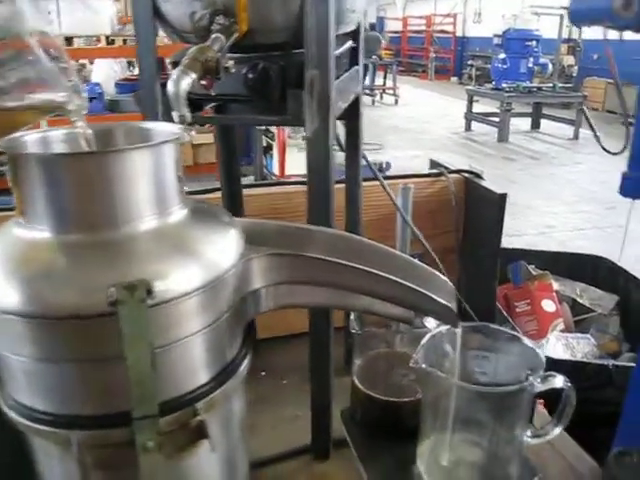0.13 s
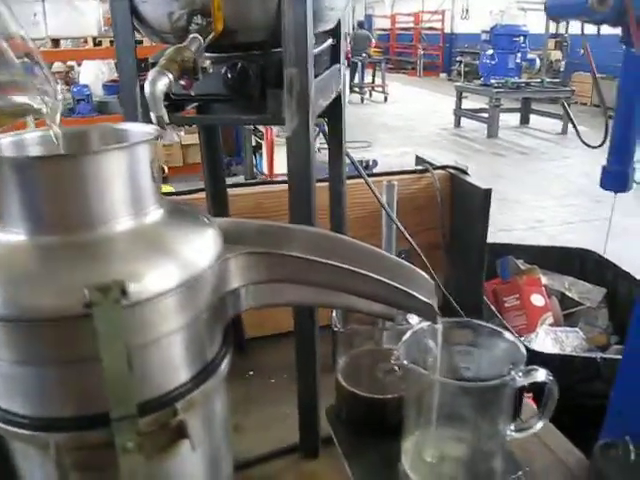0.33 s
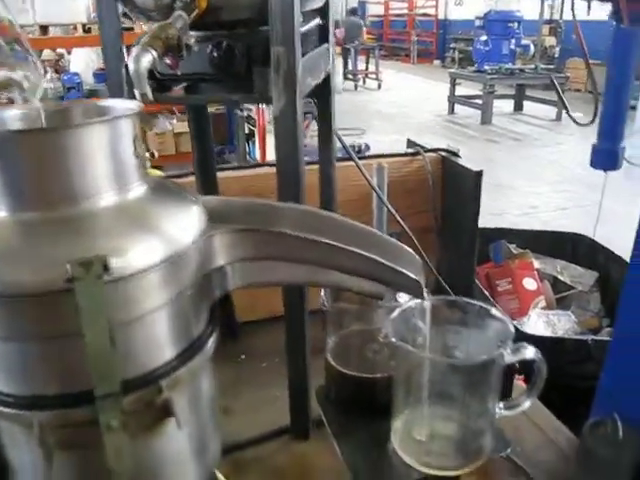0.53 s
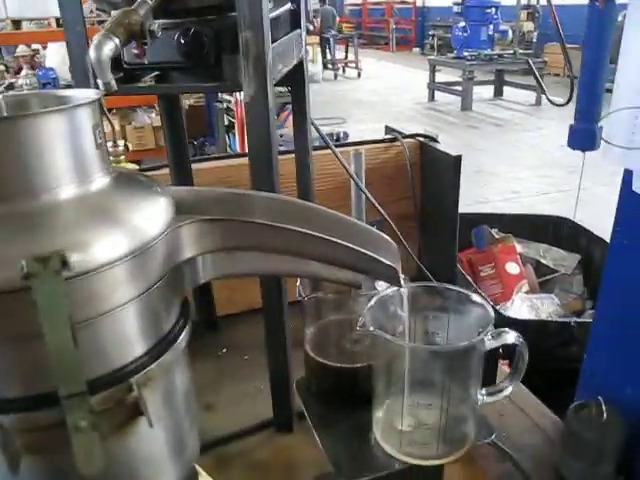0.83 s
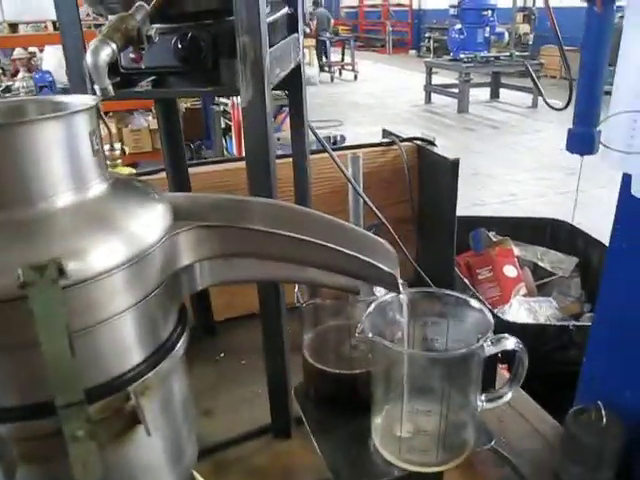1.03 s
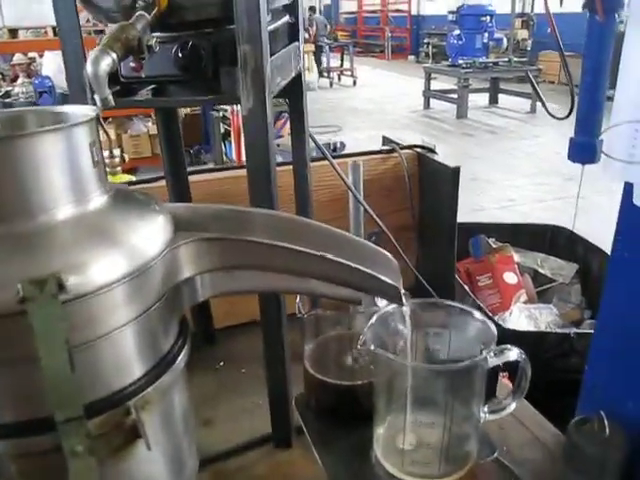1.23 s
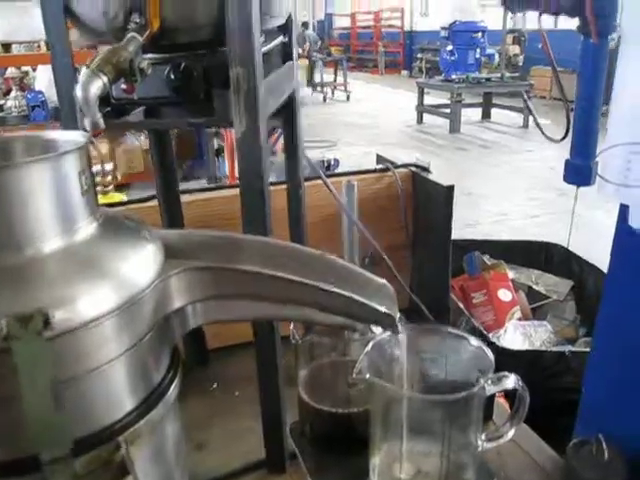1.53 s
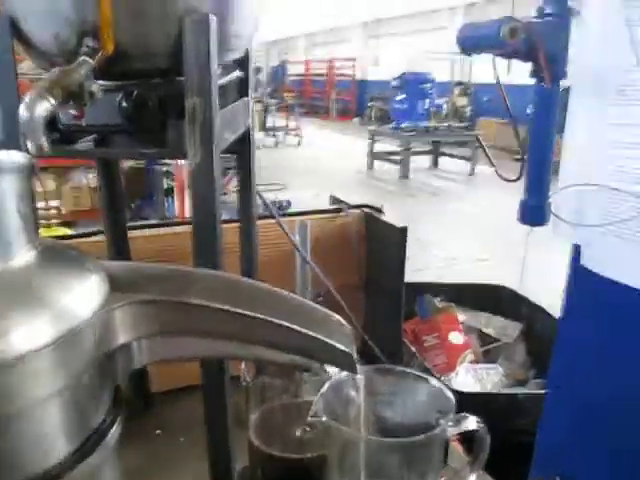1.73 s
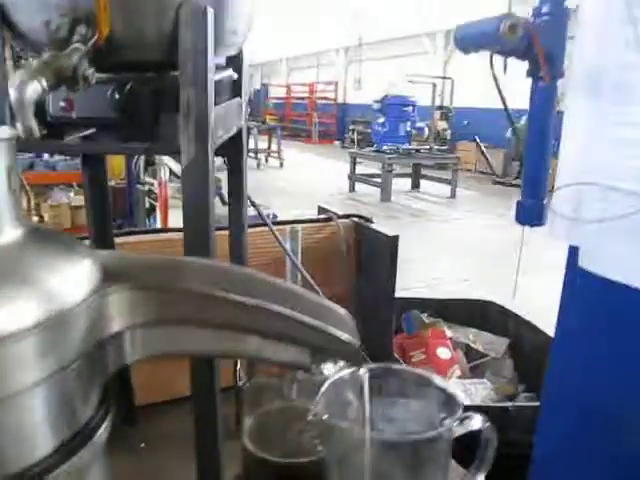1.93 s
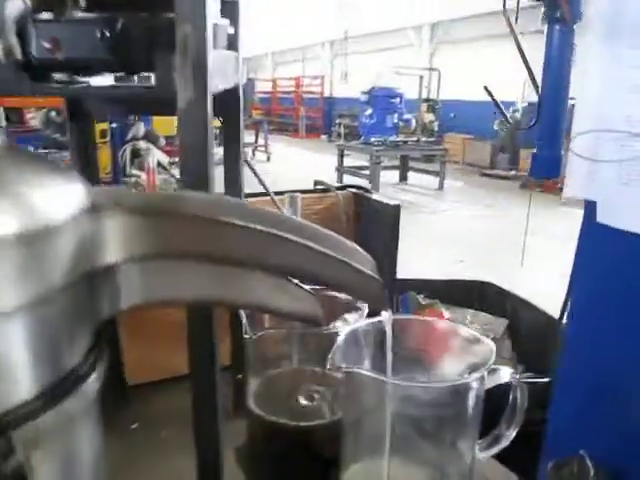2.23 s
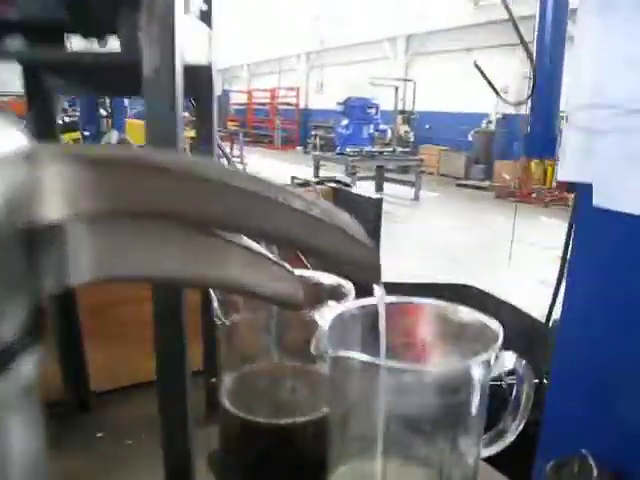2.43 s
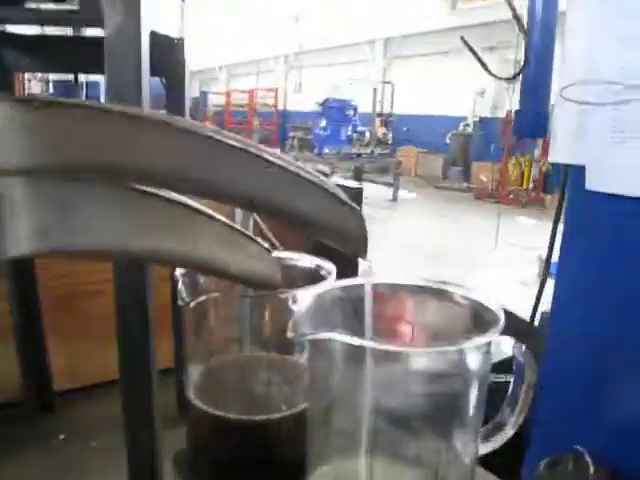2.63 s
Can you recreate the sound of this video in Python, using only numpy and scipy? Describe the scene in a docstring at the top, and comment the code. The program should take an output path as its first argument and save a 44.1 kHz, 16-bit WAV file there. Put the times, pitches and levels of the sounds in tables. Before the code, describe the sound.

An industrial centrifuge runs at steady speed for about 2.8 seconds in a large workshop. A low, buzzing gear hum near 210 hertz, with a strong overtone around 830, holds its pitch under rapid metallic rattle and hissing whirl of air and thin liquid. A tiny skip comes near 1.4 seconds. As the mono microphone moves towards the spouts, mostly by 2.3 seconds, the low hum strengthens.

```python
"""An industrial centrifuge hums at steady speed in a large workshop: a seven-per-turn gear beat and other
orders of the drive shaft are sums of cosines locked to one shaft angle at steady speed;
the recorder drops 23 ms once, so the hum skips.
Rattle rings the steel housing (noise through resonators, swelling with each tooth); whirling air and a thin
stream of liquid hiss (third-octave bands of noise with a fluttering treble).
The mono microphone drifts from the bowl towards the spouts, which shifts the balance of the parts."""
import sys
import numpy as np
from scipy import signal
from scipy.io import wavfile
from scipy.ndimage import uniform_filter1d

SR = 44100
rng = np.random.default_rng(int(sys.argv[2]) if len(sys.argv) > 2 else 0)


def invert_db(level):
    """Linear amplitude ratio for a level in decibels (20 dB per decade), elementwise."""
    return 10 ** (np.asarray(level, dtype=float) / 20)


def unload_audio(sound):
    """Save the sound as a 16-bit wav file, at the path given as the first command line argument."""
    columns = np.transpose(np.atleast_2d(sound))
    # keep every value between -1 and 1, then stretch to whole-number steps
    steps = np.round(np.clip(columns, -1, 1) * 32767)
    wavfile.write(sys.argv[1], SR, steps.astype(np.int16))


N = 123039   # length in samples

SHAFT_HZ, TEETH = 29.794, 7   # turns per second; gear beats per turn
RATTLE_FULL_HZ = 2960   # the flutter grows in proportion to pitch up to here


def rms_one(x):
    """Normalisation: a signal divided by its root mean square has unit rms."""
    return x / np.sqrt(np.mean(x ** 2) + 1e-20)


def drift(corner_hz):
    """Low-pass random process: noise through two equal one-pole filters wanders slowly with rms 1."""
    hop = 40   # samples between computed points
    pole = np.exp(-2 * np.pi * corner_hz * hop / SR)
    noise = rng.standard_normal(N // hop + 2002)
    slow = signal.lfilter([1], [1, -2 * pole, pole * pole], noise)[2000:]   # drop the onset
    return np.interp(np.arange(N) / hop, np.arange(len(slow)), rms_one(slow))


def along(way, levels_db):
    """Spatial interpolation: level between evenly spaced places from bowl to spouts."""
    return np.interp(way, np.linspace(0, 1, len(levels_db)), levels_db)


# Microphone travel from the bowl (0) to the spouts (1)
# columns: time_s, share_of_way
MICROPHONE_TRAVEL = [(0, 0.04), (.3, 0), (.5, 0.2), (.8, 0.19), (1.1, 0.36), (1.5, 0.49), (1.9, 0.57),
                     (2.25, .85), (2.5, 0.88), (2.79, 0.86)]


def microphone_way():
    """Moving receiver: its position, joined by straight lines, sets the balance of the parts."""
    time_s, share = np.transpose(MICROPHONE_TRAVEL)
    return np.interp(np.arange(N) / SR, time_s, share)


def heard_shaft_angle():
    """Uniform rotation: angle (rad) proportional to time, heard with a short stretch dropped by the recorder."""
    drop_at_s, dropped_s = 1.421, 0.0232
    t = np.arange(N) / SR
    shaft_time = t + dropped_s * (t > drop_at_s)
    return 2 * np.pi * SHAFT_HZ * shaft_time


def rattle_level(angle):
    """Amplitude modulation: random flutter plus a sinusoidal swell on each tooth, in dB at full depth."""
    flutter_hz, flutter_db, tooth_pulse_db = 26, 0.72, 0.6
    flutter = drift(flutter_hz)
    flutter = flutter - uniform_filter1d(flutter, size=SR // 6)   # no slow swells
    return flutter_db * flutter - tooth_pulse_db * np.cos(TEETH * angle)


# Relative noise spectrum of rushing air and liquid; the overall level is set afterwards
# columns: pitch_hz, bowl_density_db_per_hz, spouts_density_db_per_hz
WHIRL_SPECTRUM = [(20, -24, -28), (60, -22, -21), (141, -19, -8.5), (191, -2, -3), (330, 0.5, -2.5),
                  (504, -4.5, -9.5), (770, -4, -4), (1000, -5, -1.5), (1200, -7, -8), (1660, -10, -5),
                  (2080, -8.5, -9), (3000, -6, -8), (4450, -10, -8.5), (6100, -11.5, -17),
                  (7400, -11.5, -11), (8200, -7.5, -7.5), (10500, -16, -15.5), (16000, -21.5, -24.5)]


def whirl(way, rattle_db):
    """Broadband flow noise: third-octave bands flutter together in the treble, and each on its own."""
    rms_db, patchy_db, patchy_hz = -27, 0.33, 5.6
    edges = 20 * 2 ** (np.arange(30) / 3)
    white = rng.standard_normal((2, N + 8000))   # neighbouring bands take different noise
    hz_at, bowl_db, spouts_db = np.transpose(WHIRL_SPECTRUM)
    out = 0
    for k, (low, high) in enumerate(zip(edges, edges[1:])):
        band_pass = signal.butter(2, [low, high], "band", fs=SR, output="sos")
        band = signal.sosfilt(band_pass, white[k % 2])[8000:]
        hz = np.sqrt(low * high)
        at_bowl = np.interp(np.log(hz), np.log(hz_at), bowl_db)
        at_spouts = np.interp(np.log(hz), np.log(hz_at), spouts_db)
        level_db = at_bowl + (at_spouts - at_bowl) * way
        flutter_db = rattle_db * min(hz / RATTLE_FULL_HZ, 1)
        out = out + band * invert_db(level_db + flutter_db + patchy_db * drift(patchy_hz))
    return invert_db(rms_db) * rms_one(out)


# Resonance frequencies of the steel housing
# columns: pitch_hz
RESONANCE_HZ = [228, 395, 610, 688, 855, 950, 1030, 1100, 1275, 1380, 1470, 1770, 1858, 2265, 2450, 2660,
                2900, 3340, 3550, 3950, 4215, 4600, 4745, 4950, 5205, 5400, 5680, 5850, 6480, 6790, 7030,
                7250, 7620, 7780, 8460, 8740, 9260, 9420, 9940, 10750, 11090, 11320, 11830, 12400, 13500,
                13850, 15350]
# Damping and strength of the same resonances, in the same order; each passes its resonator twice
# columns: resonator_width_hz, bowl_level_db, midway_level_db, spouts_level_db
RESONANCES = [(50, -40, -42, -44), (50.4, -46, -46.5, -45), (60.4, -46, -39, -35),
              (56, -36.5, -38.5, -24.5), (30, -43, -34.5, -33), (60.4, -28, -30.5, -36),
              (100, -40.5, -36, -31.5), (70, -40, -41.5, -41), (110, -38.5, -36.5, -34),
              (100, -42, -39.5, -48), (75, -39.5, -38, -42.5), (70, -52, -44.5, -46), (80, -41, -43, -47),
              (70, -40, -40.5, -29.5), (91, -41, -41, -48), (110, -41, -43, -36.5), (130, -45, -42.5, -41),
              (90, -44, -40.5, -46), (110, -49, -53, -37.5), (110, -45.5, -45.5, -43),
              (60, -49, -45.5, -36.5), (100, -43.5, -48.5, -41), (140, -41.5, -42, -45),
              (70, -46, -57, -49), (70, -45, -43.5, -38), (70, -48, -44, -51), (100, -45, -49, -62),
              (90, -49, -45, -62), (100, -51, -50, -63), (90, -44, -44, -66), (140, -43, -40, -38),
              (130, -43, -41.5, -45.5), (90, -36, -42.5, -45), (65, -61, -42, -50), (70, -58, -45, -50),
              (100, -48, -42.5, -43), (55, -52, -66, -50), (55, -54, -49, -52), (80, -46, -42.5, -47),
              (45, -59, -51, -53), (60, -57, -53, -60), (60, -57, -54, -60), (100, -60, -56, -62),
              (100, -61, -56, -58), (120, -55, -55, -60), (120, -55, -56, -61), (100, -60, -58, -61)]


def housing(way, rattle_db):
    """Modal resonance: rattle noise rings each mode of the steel, which swells and fades on its own."""
    flicker_db, flicker_hz = 0.96, 27.0   # in the noise that shakes the mode
    slow_db, slow_hz = 0.5, 2.0   # in the ringing itself
    lead = 4000   # samples for the ringing to build up, then dropped
    white = rng.standard_normal((3, N + lead))   # neighbouring modes take different noise
    out = 0
    for k, (hz, (width_hz, *levels_db)) in enumerate(zip(RESONANCE_HZ, RESONANCES)):
        noise = white[k % 3]
        flutter_db = rattle_db * min(hz / RATTLE_FULL_HZ, 1)
        shaken = noise[lead:] * invert_db(flutter_db + flicker_db * drift(flicker_hz))
        pole = np.exp(-np.pi * width_hz / SR)
        mode = [1, 0, -1, 1, -2 * pole * np.cos(2 * np.pi * hz / SR), pole * pole]
        ringing = signal.sosfilt([mode, mode], np.r_[noise[:lead], shaken])[lead:]
        out = out + rms_one(ringing) * invert_db(along(way, levels_db) + slow_db * drift(slow_hz))
    return out


# Gear beat: harmonics of the tooth rate, rms levels at five evenly spaced places
# columns: tooth_multiple, bowl_level_db, quarter_level_db, half_level_db, three_quarter_level_db,
# spouts_level_db
GEAR_HARMONICS = [(1, -31, -30.5, -29.5, -27, -24.5), (2, -34.5, -33, -33.5, -34.5, -27.5),
                  (3, -38.5, -36.5, -30.5, -27, -25), (4, -21.5, -23, -24.5, -24.5, -28),
                  (5, -34.5, -33.5, -31, -38, -28), (6, -46, -56, -43, -42, -41),
                  (7, -47.5, -50, -52, -46, -58), (8, -55, -59, -52, -54, -54),
                  (11, -39.5, -36, -43.5, -61, -58), (12, -41, -39.5, -46.5, -46, -53),
                  (13, -55, -46, -49, -48, -45), (15, -48, -48, -48, -49, -53)]
# Weaker hum on the drive shaft, rms levels
# columns: shaft_multiple, level_db
SHAFT_ORDERS = [(4, -59), (6, -50.5), (9, -32.5), (10, -53), (11, -51.5), (12, -59), (13, -45), (15, -54),
                (16, -45), (17, -51), (18, -51), (19, -56), (20, -73), (22, -47.5), (23, -64), (26, -83),
                (27, -48.5), (30, -51), (33, -43), (49, -54), (62, -53), (68, -51), (95, -46.5), (98, -55)]


def hum(angle, way):
    """Order synthesis: gear harmonics and shaft orders are cosines of multiples of the shaft angle."""
    waver_db, waver_rad = 0.2, 0.09   # for gear harmonics both grow with the root of the multiple
    smear_rad = 0.0887   # the housing smears the tooth pulse: lag grows with the multiple squared
    beat_hz, beat_db = 220.8, -40   # a tone just above the tooth rate, throbbing against it
    out = 0
    for k, *levels_db in GEAR_HARMONICS:
        level = invert_db(along(way, levels_db) + waver_db * k ** .5 * drift(4.9))
        waver = waver_rad * k ** .5 * drift(1.2)
        out = out + level * np.cos(k * (TEETH * angle + np.pi) - smear_rad * k ** 2 + waver)
    for k, level_db in SHAFT_ORDERS:
        level = invert_db(level_db + waver_db * drift(1.7))
        out = out + level * np.cos(k * angle + rng.uniform(0, 2 * np.pi))
    out = out + invert_db(beat_db) * np.cos(beat_hz / SHAFT_HZ * angle + rng.uniform(0, 2 * np.pi))
    return np.sqrt(2) * out   # a cosine of rms 1 peaks at root 2


def scene():
    """Superposition: whirl, housing and hum add linearly, alike in both channels."""
    way, angle = microphone_way(), heard_shaft_angle()
    rattle_db = rattle_level(angle)
    mix = whirl(way, rattle_db) + housing(way, rattle_db) + hum(angle, way)
    return np.tile(mix, (2, 1))


def top_cut(x):
    """Nothing passes above the cut-off."""
    return signal.sosfilt(signal.butter(12, 16570, fs=SR, output="sos"), x)


def record(dry):
    """Band limiting: a steep elliptic low-pass cuts the top sharply."""
    cutoff_hz, ripple_db, stop_db = 15715, 0.5, 70
    low_pass = signal.ellip(12, ripple_db, stop_db, cutoff_hz, fs=SR, output="sos")
    mix = signal.sosfilt(low_pass, dry)
    return top_cut(mix)


dry = scene()
out = record(dry)
unload_audio(out)
```